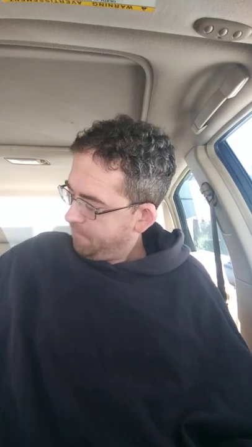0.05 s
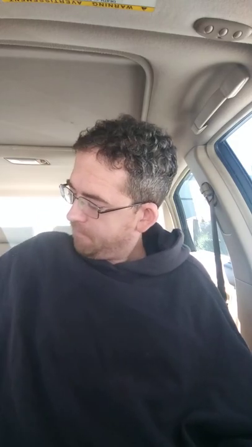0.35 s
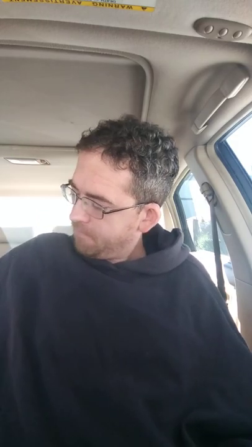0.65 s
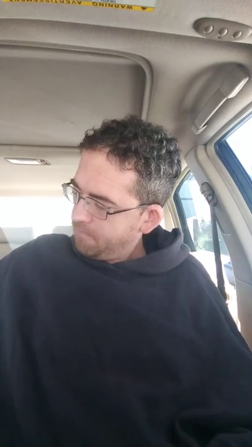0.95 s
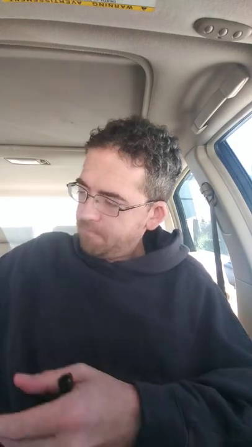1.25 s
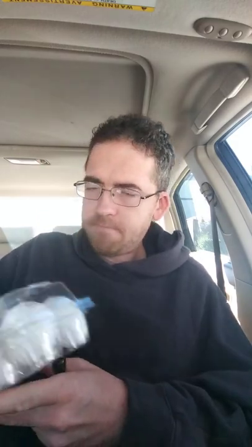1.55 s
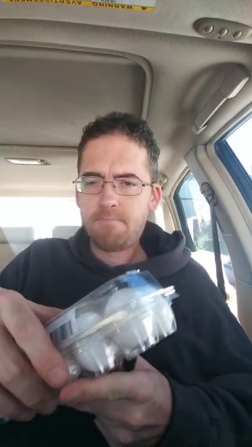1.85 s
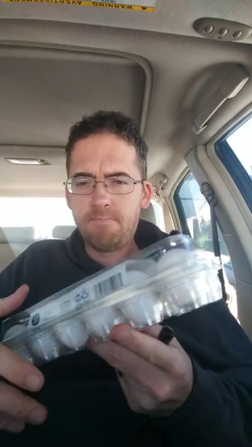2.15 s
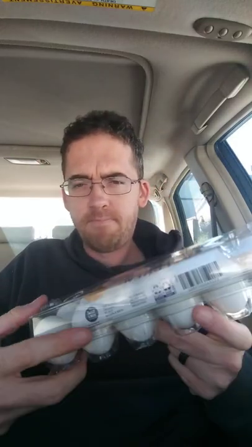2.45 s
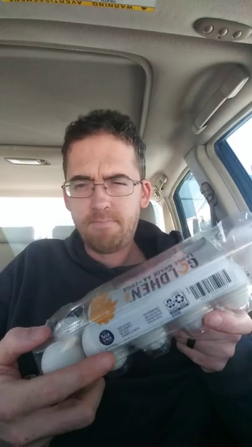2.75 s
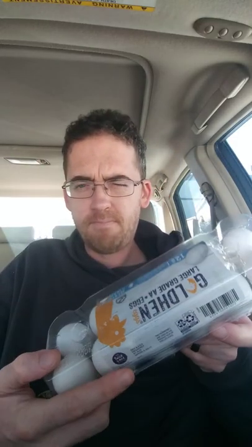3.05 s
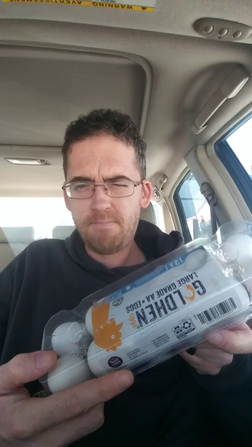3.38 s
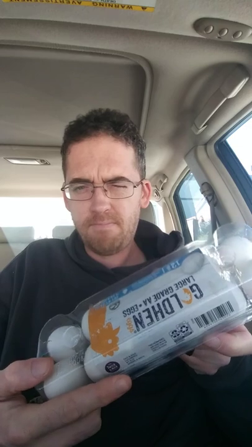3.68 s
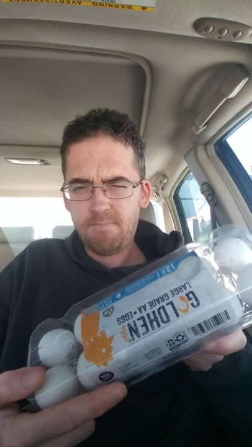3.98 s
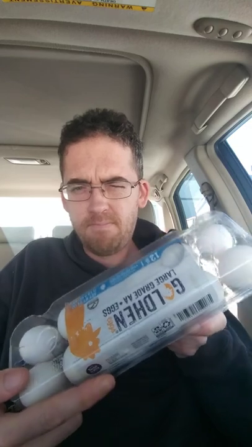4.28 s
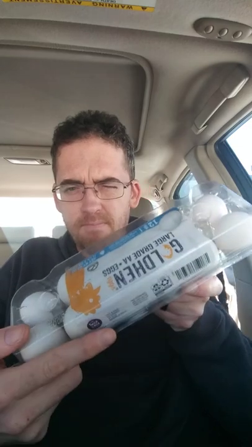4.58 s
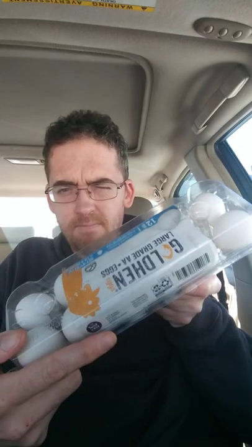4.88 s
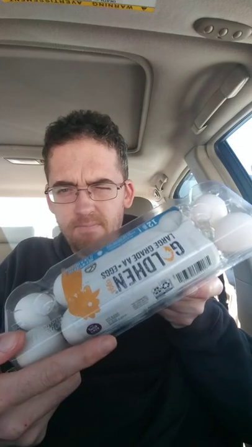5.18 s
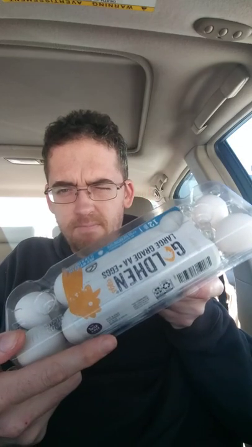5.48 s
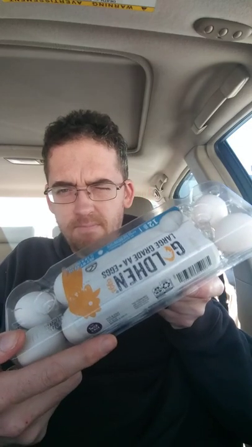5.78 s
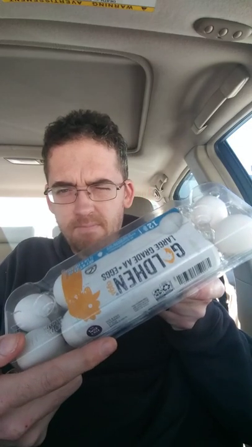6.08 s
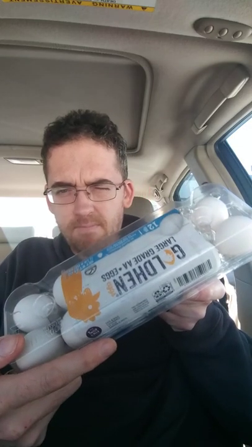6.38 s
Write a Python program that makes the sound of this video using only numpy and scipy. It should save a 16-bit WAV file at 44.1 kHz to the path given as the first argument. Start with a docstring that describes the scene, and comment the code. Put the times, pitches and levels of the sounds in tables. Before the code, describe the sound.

Inside a parked car, a few hard plastic knocks and finger scrapes sound as an egg carton is picked up. The thin plastic lands in a hand with a soft thud, then crackles, snaps and pops as it is turned over. The handling settles into lighter clicks and faint bumps of eggs in their cups. Everything is close to one microphone, dry, over a faint low hum.

```python
"""Fingers slide on thin plastic over a low hum: close up, one microphone, in a small, padded parked car.
A clear egg carton is being picked up, and things knock beside the seat as it lifts. It lands in the
hand with a thud and is turned over: creases buckle and snap, edges flick, panels pop through, and skin
and sleeve stick and slip on the shell. The eggs bump in their cups, jostling most at the furthest tilt."""
import sys
import numpy as np
from scipy import signal
from scipy.io import wavfile

SR = 44100
rng = np.random.default_rng(int(sys.argv[2]) if len(sys.argv) > 2 else 0)


def master(y):
    """Save y as 16-bit WAV."""
    cut = np.clip(np.atleast_2d(y).T, -1, 1)
    pcm = np.round(cut * 32767)  # scale
    wavfile.write(sys.argv[1], SR, pcm.astype(np.int16))


N = 287973
T = np.arange(SR // 6) / SR  # time within one blow

# fingers and sleeve sliding on the shell: start_s, length_s, level_db
STROKES = [(0, 0.48, -56), (0.5, 2.73, -61.5), (0.96, 0.38, -56.5), (1.57, 0.41, -47), (1.955, 0.16, -55),
           (2.31, 0.22, -45.5), (2.842, 0.091, -50), (3.895, 0.088, -52.5), (3.997, 0.94, -64.5),
           (4.436, 0.34, -59.5)]
# short slips of a finger: peak_s, level_db, half_width_s
FINGER_SLIPS = [(.038, -48.5, 0.0062), (0.234, -35.5, 0.021), (0.408, -32.5, 0.011), (0.951, -48, 0.0053),
                (0.993, -37.5, 0.0054), (1.015, -35.5, 0.0083), (1.105, -46, 0.012), (1.525, -46, 0.0067),
                (2.316, -37, 0.0076), (2.471, -33.5, 0.016), (2.61, -39.5, 0.033)]
# hard knocks beside the seat: start_s, ring_db, clatter_db, contact_s
KNOCKS = [(0.117, -39.5, -32.5, 0.00094), (0.405, -40, -34, 0.00085), (0.504, -43.5, -47.5, 0.006),
          (0.696, -40.5, -42.5, 0.0051), (0.7539, -50.5, -28, 0.00021), (0.764, -16.5, -23, 0.00019),
          (0.7704, -21, -31, 0.00022)]
# modes that ring in a knock: pitch_hz, gain_db
KNOCK_MODES = [(570, -5.5), (905, -10), (1040, -7), (1187, 3), (1310, -6.5), (1400, -4.5), (1470, -4),
               (2195, 3.5), (2300, -6.5), (2535, -3.5), (2655, -1)]
# creases snapping: start_s, level_db, hollow_db (relative to the level)
SNAPS = [(0.118, -46, -33), (.199, -47.5, -1), (0.289, -38, -14), (.444, -40, -21), (1.093, -43, -6),
         (1.265, -46.5, -5), (1.293, -44.5, -1), (1.326, -37.5, -13), (1.341, -41, -9),
         (1.369, -35.5, -11.5), (1.416, -33.5, -19), (1.585, -42, -4), (1.595, -36, -11),
         (1.656, -41, -1.5), (1.768, -44.5, 1.5), (1.83, -40.5, -5), (1.921, -23, -8), (1.935, -34.5, -8.5),
         (2.038, -41, -10.5), (2.173, -21, -13), (2.248, -35.5, 2), (2.35, -30, -7.5), (2.388, -31.5, -35),
         (2.407, -32, -25), (2.436, -20.5, -15.5), (2.452, -31, -4), (2.48, -35, -8), (2.544, -44.5, -0.5),
         (2.585, -41, -21), (2.908, -32.5, -7), (3.233, -42, -3.5), (3.358, -50, -8.5), (3.621, -46.5, 1),
         (3.641, -46.5, -2.5), (3.708, -36, -14), (3.835, -47.5, -9), (3.991, -33, -14.5),
         (4.011, -34.5, -13), (4.019, -31.5, -15.5), (4.443, -42, -15), (4.725, -47.5, -8.5),
         (4.812, -49.5, -5), (5.101, -48, -2), (5.255, -47, -27), (5.491, -49, 0), (5.73, -42, -5),
         (5.796, -49, 0.5), (5.886, -49.5, -22), (6.056, -34, -33), (6.216, -41, -19.5), (6.47, -37.5, -19),
         (6.499, -37, -16)]
# stiff ribs of the shell, rung by every snap: pitch_hz
RIBS_HZ = [5670, 6380, 6696, 7290]
# thin edges flicking: start_s, level_db
TICKS = [(.638, -59), (.965, -54), (1.574, -52), (1.718, -54), (1.744, -43.5), (1.887, -47.5), (1.912, -46),
         (1.954, -44), (2.046, -46), (2.334, -49), (2.362, -44), (2.77, -54), (3.612, -53.5), (3.685, -56),
         (3.903, -51), (3.967, -54), (3.982, -46.5), (4.199, -57), (4.3, -53.5), (4.65, -52), (4.868, -54),
         (4.891, -55.5)]
# the full carton landing in the hand: start_s, level_db, pitch_hz, t60_s
THUDS = [(.765, -33.5, 138, 0.074), (1.921, -30.5, 90.2, 0.19), (1.923, -26, 160, 0.049),
         (2.351, -28.5, 172, 0.062)]
# the clearest bumps of egg on cup: start_s, level_db
BUMPS = [(1.469, -56), (2.072, -51.5), (2.691, -48), (2.718, -48.5), (2.804, -46.5), (2.973, -49.5),
         (3.058, -50), (3.073, -53), (3.149, -47), (3.734, -48.5), (3.946, -46), (4.1, -53.5),
         (4.268, -48.5), (4.326, -49.5), (4.422, -50), (4.448, -45.5), (4.52, -52.5), (4.601, -47),
         (4.958, -49), (6.01, -58), (6.056, -53), (6.464, -52), (6.5, -45.5)]
# panels flipping over: start_s, level_db, pitch_hz, t60_s
POPS = [(1.784, -20, 3460, 0.014), (1.923, -20.5, 1930, 0.029), (2.4375, -10, 1660, 0.014),
        (2.4465, -13.5, 1770, 0.031)]

# spectra of the sources at the microphone: frequency_hz, gain_db
CABIN_HUM = [(25, -34.5), (45, -4.5), (65, 0), (82, -1.5), (110, -7.5), (170, -11.5), (320, -29)]
CABIN_AIR = [(300, -7.5), (650, 1), (1700, -11.5), (4500, -13.5), (7200, -11.5), (10000, -23),
             (16000, -26.5)]
GLIDE_HISS = [(1400, -5), (4900, -7.5), (7000, -1), (9500, -15.5), (13000, -19.5), (16000, -26.5)]  # a light touch sliding
SLIP_HISS = [(1400, -25.5), (3000, 1), (5000, -0.5), (7000, 1.5), (8300, -4), (9800, -12.5), (16000, -23)]  # skin sticking and slipping
HOLLOW_SHELL = [(300, -16.5), (480, -11), (680, -3.5), (900, -7.5), (1200, -1.5), (1700, -5.5), (2400, -4),
                (3400, -18)]
CARTON_HEFT = [(60, -5.5), (120, -4), (380, -19)]  # the full carton shaking
KNOCK_CLATTER = [(300, -18.5), (600, -8.5), (1300, 0.5), (2600, -6.5), (4800, -5), (6500, 2), (8500, -9),
                 (15000, -23.5)]
CREASE_CRACK = [(4300, -31), (5600, -5), (7100, 2.5), (8200, -0.5), (10000, -27)]
CLICK_FIZZ = [(7000, -33.5), (9500, -0.5), (13000, -3), (16000, -12.5)]  # the top treble of a snap or tick
THIN_SHEET = [(1500, -15.5), (2800, -4.5), (4600, -0.8), (8000, -10.5), (10500, -29.5)]
EGG_CUPS = [(220, -3.5), (440, -19), (630, 3.5), (850, -6), (1500, -7), (2300, -11.5)]

LIFTED_S, UNLIFTED_FIZZ_DB = 1.04, 14.5  # clicks are brighter until the carton is lifted
HELD_S, HELD_FIZZ_DB = 2.7, -1  # from here it is only tilted, and its clicks fizz less


def gain_of(db):
    """Decibels to amplitude."""
    return 10 ** (np.asarray(db) / 20)


def unit_rms(x):
    """Scales to rms 1."""
    return x / np.sqrt(np.mean(x ** 2) + 1e-20)


def blow(x):
    """Scales a short sound to the energy of 20 ms at rms 1."""
    return x / np.sqrt(np.sum(x ** 2) / (SR / 50) + 1e-20)


def fade(t60_s):
    """A decay of 60 dB in t60_s."""
    return np.exp(-np.log(1000) * T / t60_s)


def add(mix, start_s, sound):
    """Mixes a sound in at start_s."""
    part = mix[round(start_s * SR):][:len(sound)]
    part += sound[:len(part)]


def colour(x, spectrum, shift=1, size=4096):
    """Minimum-phase filter, so attacks stay sharp; shift multiplies the spectrum's frequencies."""
    hz, db = np.transpose(spectrum)
    log_hz = np.log(hz * shift)
    bins = np.log(np.fft.rfftfreq(size, 1 / SR) + 1)
    outside = np.maximum(log_hz[0] - bins, 0) + np.maximum(bins - log_hz[-1], 0)
    log_gain = np.log(gain_of(np.interp(bins, log_hz, db))) - 2 * outside
    analytic = signal.hilbert(np.r_[log_gain, log_gain[-2:0:-1]])
    taps = np.fft.ifft(np.exp(analytic.conj())).real[:size // 2]
    return signal.fftconvolve(x, taps)[:len(x)]


def resonance(x, hz, width_hz):
    """Passes a sound through one mode of the plastic."""
    return signal.lfilter(*signal.iirpeak(hz, hz / width_hz, SR), x)


def burst(t60_s, tail_t60_s, tail_db):
    """Waves race briefly round the plastic; a weaker tail lingers in the cabin."""
    return rng.standard_normal(len(T)) * (fade(t60_s) + gain_of(tail_db) * fade(tail_t60_s))


def ring(hz, t60_s, rise_s):
    """One dying mode."""
    return np.sin(2 * np.pi * (hz * T + rng.random())) * fade(t60_s) * (1 - np.exp(-T / rise_s))


def cabin(hum_db=-51.5, air_db=-66.5):
    """Room tone of the car: a low rumble that slowly eases, and faint air noise."""
    hum, air = rng.standard_normal((2, N))
    easing_db = np.linspace(1.5, -1.5, N)
    rumble = gain_of(hum_db + easing_db) * unit_rms(colour(hum, CABIN_HUM))
    return rumble + gain_of(air_db) * unit_rms(colour(air, CABIN_AIR))


def stroke(t, start_s, length_s, db, attack_s=.02, release_s=.0088, arch_db=.5):
    """Level of one slide: it sets in quickly, presses hardest in the middle, and lets go."""
    attack = np.clip((t - start_s) / attack_s, 0, 1)
    release = np.exp(-np.maximum(t - start_s - length_s, 0) / release_s)
    off_centre = np.clip(2 * (t - start_s) / length_s - 1, -1, 1)
    return gain_of(db - arch_db * off_centre ** 2) * attack * release


def hand_pressure(waver_db=3.5, waver_s=.015):
    """Level of all strokes together, wavering with the unsteady hand."""
    t = np.arange(0, N / SR, .002)
    level = np.sqrt(sum(stroke(t, *row) ** 2 for row in STROKES) + 1e-12)
    waver = np.interp(t, np.arange(len(t)) * waver_s, rng.standard_normal(len(t)))
    return np.interp(np.arange(N) / SR, t, level * gain_of(waver_db * waver))


def stick_slip(slips_per_s=550, spread_db=4.5, spots=40):
    """Tiny slips of uneven size; each spot on the shell answers with a few cycles of its own pitch."""
    out = np.zeros(N)
    clicks = []
    for hz in rng.uniform(900, 10000, spots):
        click = blow(burst(t60_s=.005, tail_t60_s=.06, tail_db=-11))
        clicks.append(click + .5 * blow(ring(hz, t60_s=.004, rise_s=.0001)))
    for when, chance, spot in rng.random((int(slips_per_s * N / SR), 3)):
        size = gain_of(spread_db * min(-np.log(chance), 3))
        add(out, when * N / SR, size * clicks[int(spot * spots)][:SR // 20])
    return unit_rms(out)


def rubbing(grip_db=-54, grip_range_db=3.5):
    """A light slide is a thin hiss; under pressure it breaks into slips that shake the heavy carton."""
    level = hand_pressure()
    grip = .85 / (1 + np.exp((grip_db - 20 * np.log10(level)) / grip_range_db))  # share of stick-slip
    slipping, gliding = np.sqrt(grip), np.sqrt(1 - grip)
    slips, glide = stick_slip(), rng.standard_normal(N)
    slide = slipping * slips + gliding * glide
    body = unit_rms(colour(slide, HOLLOW_SHELL)) + gain_of(-1) * unit_rms(colour(slide, CARTON_HEFT))
    hiss = slipping * unit_rms(colour(slips, SLIP_HISS)) + gliding * unit_rms(colour(glide, GLIDE_HISS))
    return level * (hiss + grip * body)


def swell(peak_s, db, half_width_s):
    """The bell-shaped level of one quick slide."""
    return gain_of(db) * np.exp(-((np.arange(N) / SR - peak_s) / half_width_s) ** 2 / 2)


def finger_slips(hollow_db=-6.5):
    """A finger slips: a short rasp with the hollow shell behind it."""
    rasp = stick_slip()
    force = sum(swell(*row) for row in FINGER_SLIPS)
    hollow = gain_of(hollow_db) * unit_rms(colour(rasp, HOLLOW_SHELL))
    return force * (unit_rms(colour(rasp, SLIP_HISS)) + hollow)


def seat_knocks(detune=.012, width_hz=72):
    """Stiff plastic is struck: modes under a brief clatter; a long, soft contact favours the low ones."""
    out = np.zeros(N)
    onset = 1 - np.exp(-T / .003)
    for start_s, ring_db, clatter_db, contact_s in KNOCKS:
        push = burst(t60_s=.008, tail_t60_s=.075, tail_db=-16)
        tuning = 1 + rng.uniform(-1, 1) * detune
        modes = np.zeros(len(T))
        for hz, db in KNOCK_MODES:
            strength = gain_of(db) / (1 + (hz * contact_s) ** 2)
            modes += strength * blow(resonance(push, hz * tuning, width_hz))
        clatter = colour(burst(t60_s=.046, tail_t60_s=.09, tail_db=-9) * onset, KNOCK_CLATTER)
        add(out, start_s, gain_of(ring_db) * blow(modes) + gain_of(clatter_db) * blow(clatter))
    return out


def handling_fizz_db(start_s):
    """Change in a click's fizz: up before the lift, slightly down once the carton is held."""
    return UNLIFTED_FIZZ_DB * (start_s < LIFTED_S) + HELD_FIZZ_DB * (start_s > HELD_S)


def sheet_click(stiffness):
    """The dry midrange click of the sheet; a stiffer spot sounds higher."""
    return blow(colour(burst(t60_s=.012, tail_t60_s=.075, tail_db=-10), THIN_SHEET, stiffness))


def crumple(sound, rise_s, folds_per_s=600):
    """A quick run of tiny folds repeats the sound, swelling and dying away."""
    folds = rng.standard_normal(len(T)) * (rng.random(len(T)) < folds_per_s / SR)
    return blow(signal.fftconvolve(folds * T * np.exp(-T / rise_s), sound)[:len(T)])


def crease_snaps(rib_db=-3, panel_db=-6.5, fold_db=-8, fold_lead_s=.006, typical_db=-37):
    """A crease buckles: a dry crack across the sheet, ringing ribs, and the hollow shell behind it."""
    out = np.zeros(N)
    for start_s, db, hollow_db in SNAPS:
        crack = burst(t60_s=.0097, tail_t60_s=.07, tail_db=-9.5)
        crack[0] += 4  # sharp leading edge
        crack_shift, shell_shift, stiffness = 1 + rng.uniform(-1, 1, 3) * [.03, .08, .17]
        bright = blow(colour(crack, CREASE_CRACK, crack_shift))
        ribs = blow(sum(resonance(bright, hz, width_hz=70) for hz in RIBS_HZ))
        bright = blow(bright + gain_of(rib_db) * ribs)
        push = burst(t60_s=.02, tail_t60_s=.085, tail_db=-7)
        hollow = blow(colour(push, HOLLOW_SHELL, shell_shift))
        sheet = sheet_click(stiffness)
        panel = blow(ring(hz=rng.uniform(3200, 5975), t60_s=.028, rise_s=.0002))
        # a wide buckle moves the whole sheet and crumples it; a small one only rings high
        wide = np.clip(gain_of(.52 * hollow_db), 0, .9)
        body = wide * (sheet + gain_of(panel_db) * panel) + gain_of(hollow_db) * hollow
        fizz_db = -16 + .32 * (db - typical_db) + handling_fizz_db(start_s)  # hard buckles fizz more
        fizz = gain_of(fizz_db) * blow(colour(crack, CLICK_FIZZ))
        add(out, start_s, gain_of(db) * (np.sqrt(1 - wide ** 2) * bright + body + fizz))
        add(out, start_s - fold_lead_s, gain_of(db + fold_db) * wide * crumple(body, fold_lead_s))
        if db > -30:  # a faint click just ahead of each loud snap
            add(out, start_s - .0035, gain_of(db - 17) * sheet)
    return out


def edge_ticks():
    """A thin edge flicks: a click with no hollow body, the harder the fizzier."""
    out = np.zeros(N)
    for start_s, db in TICKS:
        flick = burst(t60_s=.008, tail_t60_s=.066, tail_db=-9)
        fizz_db = .7 * (db + 40.5) + handling_fizz_db(start_s)
        fizz = gain_of(fizz_db) * blow(colour(flick, CLICK_FIZZ))
        add(out, start_s, gain_of(db) * (fizz + sheet_click(stiffness=rng.uniform(.97, 1.4))))
    return out


def hand_thuds():
    """The full carton lands in the hand and swings in a low mode."""
    out = np.zeros(N)
    for start_s, db, hz, t60_s in THUDS:
        add(out, start_s, gain_of(db) * ring(hz, t60_s, rise_s=.0013))
    return out


def egg_bumps(jostles_per_s=15, jostle_db=-56, spread_db=5.5, tilt_s=4.4, settle_db_per_s=7):
    """Eggs meet their cups softly, with fainter jostling that is loudest at the furthest tilt."""
    out = np.zeros(N)
    contacts = list(BUMPS)
    count = int((N / SR - HELD_S) * jostles_per_s)
    for k, (when, size) in enumerate(rng.random((count, 2))):
        start_s = HELD_S + (k + when) / jostles_per_s
        db = jostle_db + spread_db * (2 * size - 1) - settle_db_per_s * abs(start_s - tilt_s)
        contacts.append((start_s, db))
    onset = 1 - np.exp(-T / .003)
    for start_s, db in contacts:
        firmness = np.interp(db, [-53, -45], [0, 1])  # firm bumps also click the sheet
        push = burst(t60_s=.03, tail_t60_s=.08, tail_db=-10) * onset
        octaves = .15 * rng.uniform(-.74, 1)
        cup = blow(colour(push, EGG_CUPS, 2 ** octaves))
        add(out, start_s, gain_of(db) * (cup + firmness * sheet_click(stiffness=1)))
    return out


def panel_pops():
    """A panel flips over and rings briefly at one pitch."""
    out = np.zeros(N)
    for start_s, db, hz, t60_s in POPS:
        add(out, start_s, gain_of(db) * ring(hz, t60_s, rise_s=.00079))
    return out


def palm_skid(lid_db=-3.5):
    """The palm slides fast along the lid: a smooth, high hiss with the hollow lid ringing under it."""
    slide = rng.standard_normal(N)
    hiss = unit_rms(colour(slide, CREASE_CRACK))
    lid = unit_rms(resonance(slide, hz=1150, width_hz=180))
    return swell(peak_s=1.825, db=-41.5, half_width_s=.035) * (hiss + gain_of(lid_db) * lid)


def scene():
    """The carton close by and the car around it, in mono."""
    carton = crease_snaps() + edge_ticks() + panel_pops() + hand_thuds() + egg_bumps()
    friction = rubbing() + finger_slips() + palm_skid()
    return (carton + friction + seat_knocks() + cabin())[None]


def record(dry, cutoff_hz=15800):
    """The microphone channel cuts off steeply in the top treble."""
    lowpass = signal.firwin(511, cutoff_hz, window=("kaiser", 9), fs=SR)
    return signal.oaconvolve(dry, lowpass[None], "same")


dry = scene()
out = record(dry)
master(out)
```